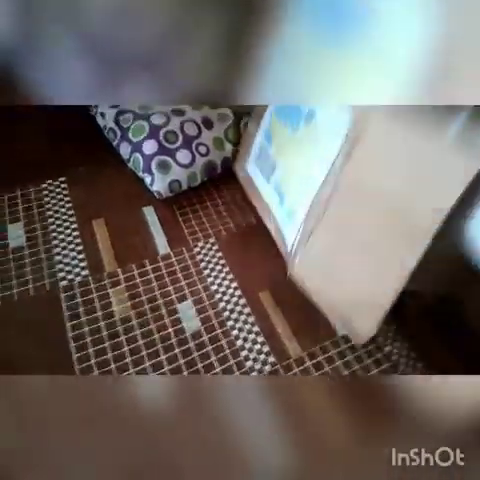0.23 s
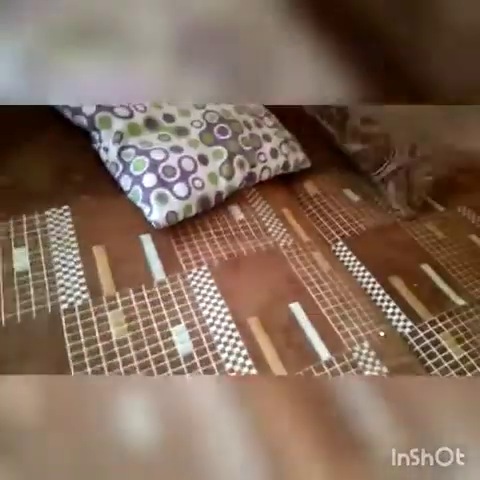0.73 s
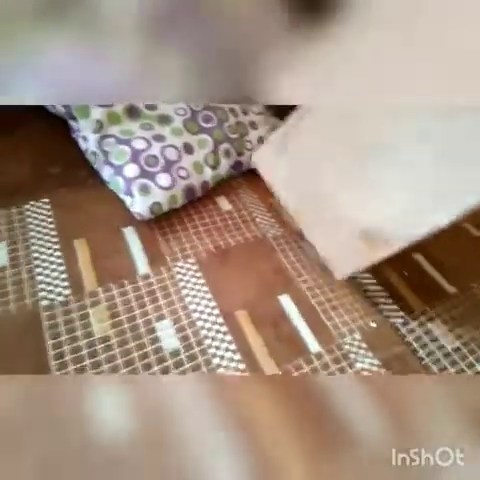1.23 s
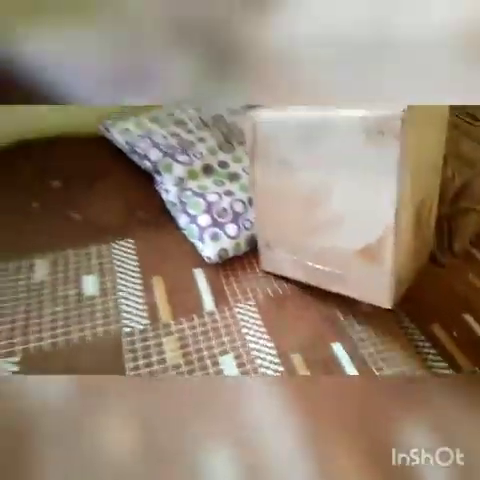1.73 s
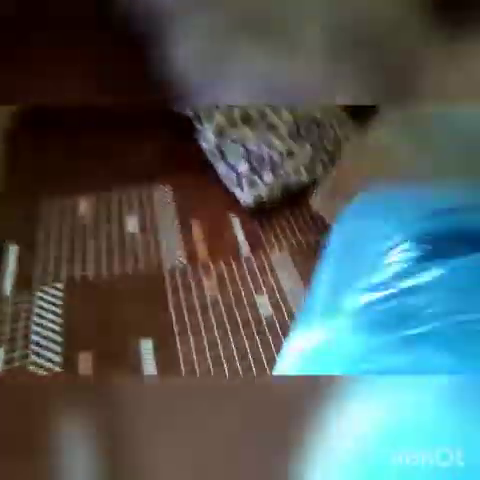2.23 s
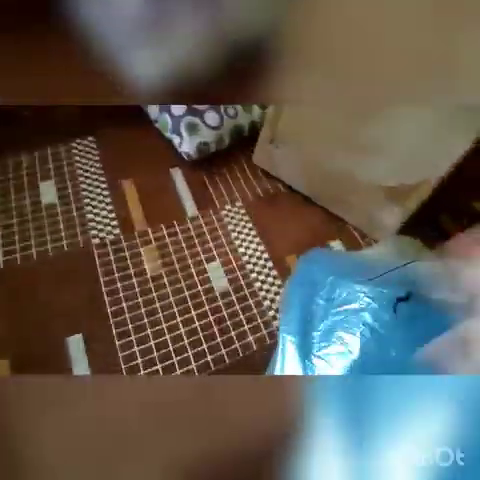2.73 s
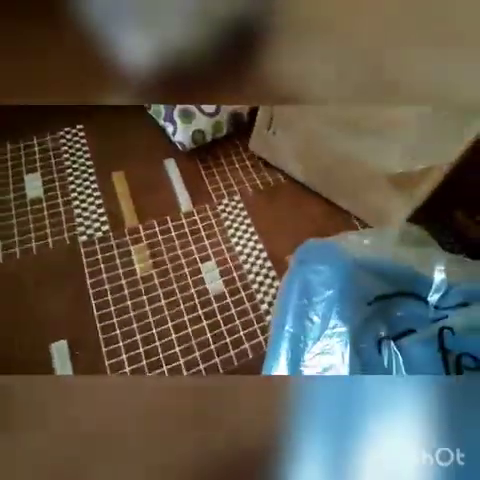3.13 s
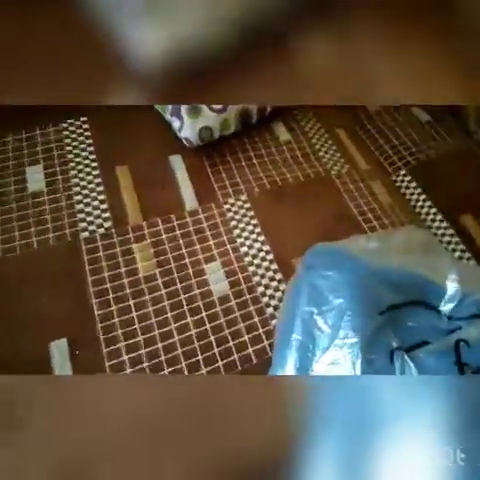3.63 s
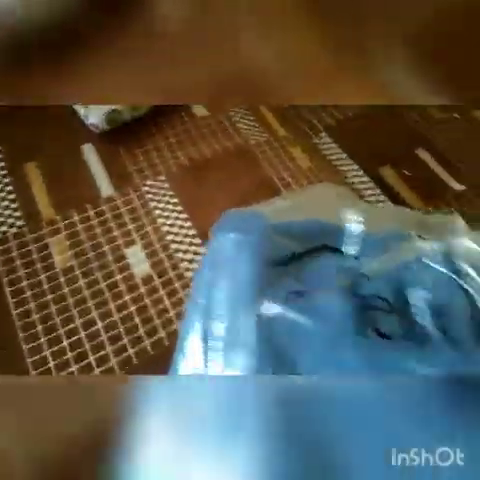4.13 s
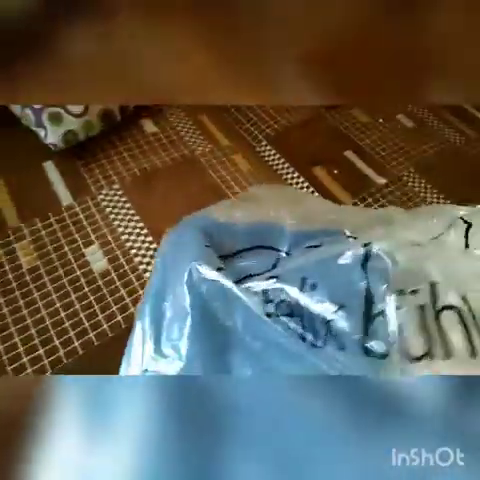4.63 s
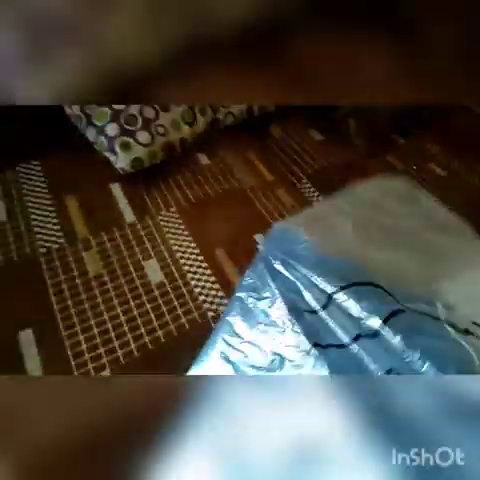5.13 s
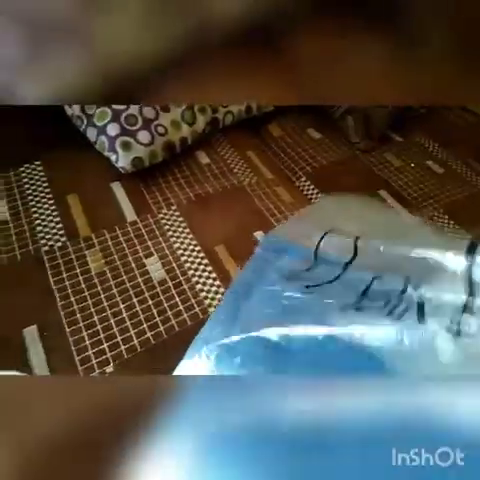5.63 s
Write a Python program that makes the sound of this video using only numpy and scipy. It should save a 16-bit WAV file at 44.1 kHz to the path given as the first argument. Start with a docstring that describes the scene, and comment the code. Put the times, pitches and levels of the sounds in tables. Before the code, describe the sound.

A cardboard box and a thin plastic bag are handled close to the microphone on a bed. From 0 to 1.2 s, dull bumps and cardboard rubbing mix with light film crackle and soft low mattress thuds. A sharper hollow knock lands at about 1.35 s, with smaller bumps until 1.55, then it goes almost silent. From 1.85 to 2.2 s plastic crumples in quick bright snaps; a low thud and rustle follow at 2.4. After a hush, a crisp crack bursts at 2.8 s. Boxy knocks cluster around 3.2 to 3.45, then quiet, and heavy dull bumps come at 3.9 to 4 s. From 4.05 to 5.1 s the film crackles densely, with loud buckles and soft rubbing. It drops to near silence around 5.35, then rustles again from 5.5 s to the end. Dry room; left side crisp and slightly whistly, right side muffled and quieter.

```python
"""A plastic bag is pulled out and handled while a cardboard box is tipped, knocked and set down on a bed.
Film: swarms of tiny snaps as band-limited noise, plus loud single buckles and dry ticks.
Box: rubbing and knocks drive damped wall modes that ring dully. Bed: low noise thuds from the mattress.
Two microphone ports: the left is open and resonates near 9.5 kHz; the right is covered by a hand, late and dull."""
import sys
import numpy as np
from scipy import signal
from scipy.io import wavfile
from scipy.ndimage import uniform_filter1d

SR = 44100
rng = np.random.default_rng(int(sys.argv[2]) if len(sys.argv) > 2 else 0)


def store_pcm(level_fs):
    """Save levels as 16-bit WAV."""
    pcm = np.round(np.clip(level_fs, -1, 1) * 32767).astype(np.int16)
    wavfile.write(sys.argv[1], SR, np.atleast_2d(pcm).T)


N = 258867
TOP_HZ = 15900  # upper limit of the sound


def film():
    """Small creases snap high and short, wide folds pop lower and longer; each port hears its own facets."""
    # Loud single buckles. Each row: time in seconds, relative level in dB, body against treble in dB.
    buckles = [(0.3631, -23.5, -26), (0.438, -32, -12), (0.5342, -24.5, -15), (0.801, -28.5, -14),
               (0.924, -21, -25), (1.3883, -44, -23), (1.503, -35, -6), (1.555, -31, -35),
               (1.622, -65, -30), (1.6448, -60, -26), (1.6883, -68, 8), (1.721, -67, -25),
               (1.749, -67.5, 10.5), (1.8397, -44, -20), (1.846, -49, -21), (1.8535, -24, -14.5),
               (1.877, -45, -12), (1.9136, -38, -16), (1.95, -30.5, -4), (1.966, -31, -16),
               (1.986, -23, -17), (1.993, -29, -18), (2.0144, -20, -20), (2.0644, -17, -17),
               (2.088, -18, -5), (2.1327, -26, -21), (2.611, -25.5, -30), (2.79, -32, 8), (2.7985, -15, -5),
               (2.8, -15.5, 3), (2.866, -19, -20), (2.876, -24.5, -16), (2.9235, -29, -15),
               (2.945, -28.5, -19), (3.201, -39, -19), (3.239, -30, -22), (3.2984, -25, -18),
               (3.3793, -26, -15), (3.6807, -40.5, 3.5), (3.8387, -32.5, -26), (3.8884, -23.5, -7),
               (4.043, -27, -26), (4.084, -24, -4), (4.159, -15.5, -5.5), (4.2313, -23, -19),
               (4.2757, -21, -14), (4.2984, -22, -21), (4.307, -22, -21), (4.312, -28, -18),
               (4.4075, -19.5, -18), (4.454, -25, -15), (4.4719, -16.5, -19), (4.476, -20, -18),
               (4.4805, -23, -15), (4.56, -30, 8), (4.624, -26, -4), (4.7211, -22, -21), (4.74, -24, -20),
               (4.861, -23, -22), (4.887, -23, -18), (4.942, -20, -19), (4.993, -21, -23),
               (5.0472, -24, -15), (5.199, -31.5, -32), (5.23, -43, -26.5), (5.5164, -43, -22),
               (5.607, -23, -21), (5.6395, -19, -25), (5.7423, -22, -24)]
    # Crease sizes. Each row: band from in Hz, band to in Hz, level in dB, likeness at the two ports 0-1,
    # share of the loud buckles in dB.
    creases = [(723, 1773, 5, 0.6, 3), (1473, 3110, 2.5, 0, 2), (2530, 5710, -0.5, 0.46, -5),
               (5560, 8260, -3, 0, -4.5), (6950, 12570, -4.5, 0.01, 3.5), (9910, 36000, -5.5, 0.08, -5)]
    # Moves that crumple the bag. Each row: time in seconds, hold in seconds, fade in dB per second,
    # relative crinkle level in dB, body of the crinkle against its treble in dB.
    crumples = [(0.0, 0.22, 110, -48, 1.5), (0.298, 0.16, 102, -43.5, -2.5),
                (0.529, 0.044, 131, -43.5, 1.5), (0.636, 0.059, 198, -39.5, -3),
                (0.807, 0.022, 97, -34, -4.5), (0.93, 0, 296, -44.5, 2), (1.012, 0.015, 152, -38, -1.5),
                (1.085, 0.072, 296.5, -46.5, -2.5), (1.168, 0.014, 548, -40, -11),
                (1.273, 0.0022, 404, -36.5, -17.5), (1.387, 0.026, 599, -59.5, -9),
                (1.406, 0.15, 209, -74.5, 4), (1.6, 0.33, 200, -88.5, 3.5), (1.713, 0, 400, -84, -11),
                (1.489, 0.018, 798, -50.5, -6.5), (1.553, 0, 400, -56, -19), (1.846, 0.013, 900, -61, -4),
                (1.88, 0.012, 498, -61.5, -4), (1.915, 0.1, 400, -61, -4), (1.977, 0.016, 495, -43, 0),
                (2.12, 0.22, 250, -48.5, -1.5), (2.025, 0.046, 294, -35.5, -2.5),
                (2.384, 0, 176, -35, -1.2), (2.49, 0.096, 80, -58.5, -0.5), (2.62, 0.037, 302, -50, -14.5),
                (2.79, 0.051, 904, -37.5, 3), (2.85, 0.016, 497, -41.5, 2), (2.876, 0.14, 396, -49, 1),
                (3.021, 0.022, 452, -45, -3), (3.152, 0.058, 200, -82, -14),
                (3.214, 0.018, 246, -40.5, -4.5), (3.295, 0.2, 248, -55, -21),
                (3.405, 0.033, 250, -43.5, 3), (3.49, 0, 351, -52.5, -1), (3.634, 0.076, 495, -59, -9.5),
                (3.735, 0.093, 140, -52.5, -31), (3.777, 0.013, 209, -55.5, -1.5),
                (3.894, 0.0038, 177, -44.5, -6), (3.966, 0.014, 290, -43.5, -2),
                (4.144, 0.15, 195, -43, -1), (4.55, 0.13, 194.5, -44, 1), (4.084, 0.018, 211, -38, -2.5),
                (4.31, 0, 116.5, -42, 1), (4.376, 0, 132, -36.5, 0.5), (4.464, 0.021, 306.5, -39.5, 1),
                (4.69, 0.055, 168, -42, -3), (4.822, 0.047, 197.5, -36, 0.5),
                (4.962, 0.038, 147, -37.5, -0.5), (5.076, 0.098, 396, -48.5, 1),
                (5.189, 0.0091, 362, -48, -24), (5.303, 0.051, 122.5, -79, 4.5),
                (5.518, 0.18, 798, -49, 0.5), (5.601, 0.027, 237, -43.5, 0), (5.674, 0.027, 200, -42.5, 0),
                (5.74, 0.024, 184, -40, -1.5), (5.828, 0.049, 161, -40, -1.5)]
    swell_ratio = 1.385  # swell speed against fade speed
    buckle_tail_s, fold_tail_s = .00065, .0021
    taut_from_s, tick_slack_db, tick_taut_db = 4.05, -7.5, -1.5  # ticks are louder on taut film

    crumple = moves(crumples, swell_ratio)
    db, body_db = np.transpose(crumples)[3:]
    treble, body = crumple(db), crumple(db + body_db)
    buckle_s, buckle_db, buckle_body_db = np.transpose(buckles)

    sheet = unit(swarm(1200, 3.1, clump_db=1.5, tail_s=.0007))
    ticks = unit(swarm(130, 2.2, clump_db=1.5, tail_s=.0004)) * treble
    slack = np.arange(N) < taut_from_s * SR
    ticks = ticks * undb(np.where(slack, tick_slack_db, tick_taut_db))

    out = 0
    for lo_hz, hi_hz, size_db, alike, share_db in creases:
        small = lo_hz > 4000
        # every loud buckle has its own colour
        colour_db = share_db + 1.2 * rng.standard_normal(len(buckle_s))
        if small:
            loud = bursts(buckle_s, buckle_db + colour_db - 5, buckle_tail_s)
            loud = loud + ticks * undb(size_db)
        else:
            loud = bursts(buckle_s, buckle_db + buckle_body_db + colour_db - 7, fold_tail_s)
        out = out + band(loud * np.sign(pair(alike)), lo_hz, hi_hz)

        edges_hz = np.geomspace(lo_hz, min(hi_hz, TOP_HZ), 4)
        for from_hz, to_hz in zip(edges_hz, edges_hz[1:]):
            # creases of one size buckle on their own and also when the whole sheet moves
            own = unit(swarm(0.11 * lo_hz, 2.2, clump_db=2.5, tail_s=13.6 / lo_hz))
            level = undb(size_db + 0.67 * walk(35)) * (treble if small else body)
            force = (own + 0.6 * sheet) * level
            out = out + band(force * pair(alike), from_hz, to_hz)
    return out * pauses()


def box():
    """Rubbing and knocks ring the same walls; a knock favours the wall nearest its pitch."""
    # Knocks. Each row: time in seconds, relative level in dB, pitch of the wall that is hit in Hz,
    # sharp edge against level in dB, contact pulse against level in dB.
    knock_rows = [(0.1771, -23, 257, -30, 11.5), (0.183, -24, 148, -41, 2), (0.31, -25.5, 111, -18, -3),
                  (0.349, -18.5, 312, -30, -4), (0.401, -35.5, 322, -2, -17), (0.545, -28.5, 790, -7, -11),
                  (0.771, -34, 326, 0, -5), (0.797, -22.5, 162, -23, -14), (0.81, -27, 180, -6, -14),
                  (1.027, -25, 289, -23, -9), (1.236, -38, 55.8, -25, -27), (1.3419, -19.5, 248, -42, -20),
                  (1.3433, -16, 403, -10.5, -10.5), (1.36, -21.5, 170, -35, -21),
                  (1.417, -24.5, 388, -30, -24), (1.42, -28.5, 245, -28, -25), (1.454, -26, 52.3, -34, -16),
                  (1.503, -23.5, 965, -35, -31), (1.558, -32, 231, -30, -22), (1.563, -39.5, 387, -28, -6),
                  (1.615, -50, 238, -38, -25), (1.658, -46, 235, -32, -21), (1.697, -50.5, 203, -34, -22),
                  (1.848, -59, 797, 5, -25), (2.037, -32, 77, -17, -20), (2.355, -18, 91, -22, -9),
                  (2.799, -27.5, 460, -8, -6), (3.197, -27, 176, -19, -2), (3.238, -12.5, 163, -23, -26),
                  (3.261, -18.5, 200, -12.5, -31), (3.314, -33.5, 740, -30, -25),
                  (3.338, -32, 670, -30, -25), (3.385, -29, 740, -24.5, -20), (3.545, -40, 220, -29, -25),
                  (3.399, -23, 306, 1, 6), (3.408, -11.5, 216, -7.5, -2), (3.413, -18, 800, -7, 5),
                  (3.443, -12.5, 217, -16.5, -25), (3.7, -51, 385, -30, -19),
                  (3.836, -30.5, 61.9, -14.5, -9), (3.885, -22, 203, -35, -4),
                  (3.946, -13.5, 163, -32, -37), (3.961, -12, 111, -38, -25), (3.968, -14.5, 199, -20, -6),
                  (4.212, -38, 52, -15, -18), (4.393, -35.5, 360, -11, 7), (4.556, -31, 441, -13, 1.5),
                  (4.799, -37.5, 370, -26, -8), (5.325, -54, 310, -20, -1.5), (5.368, -58, 394, -10, -12)]
    # Modes of the walls and cavity. Each row: frequency in Hz, level in dB, T60 in seconds.
    walls = [(51.3, -5, 0.15), (76, -2, 0.081), (108, -1.5, 0.23), (174.6, -2, 0.21), (202.2, -9.5, 0.24),
             (214.6, -0.5, 0.15), (248.9, 1.5, 0.13), (293.3, 3.5, 0.093), (369.5, 11, 0.05),
             (406, -0.5, 0.12), (513, 1, 0.029), (687, -1, 0.05), (811, -2, 0.059), (917, -4.5, 0.055),
             (1060, -6.5, 0.039), (1550, -18.5, 0.015)]
    # Moves that rub the box. Each row: time in seconds, hold in seconds, fade in dB per second,
    # relative rub level in dB, scrape of the flaps against it in dB, pitch of the wall that is held in Hz.
    rubs = [(0.0, 0.2, 191, -45.5, -6.5, 330), (0.188, 0.03, 504, -39.5, -16.5, 252),
            (0.235, 0.19, 155.5, -46, -4, 260), (0.359, 0.033, 202, -34, -11, 280),
            (0.423, 0.13, 200, -57.5, 8, 324), (0.64, 0.057, 114, -38, -5, 202),
            (0.696, 0.23, 202, -44.5, -1, 250), (0.78, 0.05, 200, -33.5, -4.5, 237),
            (1.007, 0.05, 103.5, -41.5, -0.5, 294), (1.175, 0.025, 814, -55.5, 9, 343),
            (1.259, 0.062, 499, -49, -2, 160), (1.337, 0.12, 1895, -32.5, -26, 232),
            (1.489, 0.035, 500, -57.5, 3.5, 161), (1.557, 0, 128, -50.5, -28, 242),
            (1.848, 0, 196, -83, 18, 288), (1.993, 0.078, 190, -41.5, -4, 197),
            (2.234, 0, 135, -60, 6.5, 410), (2.372, 0.018, 125, -39.5, -4.5, 276),
            (2.813, 0.0068, 236, -37, 0, 314), (2.928, 0.099, 261, -55.5, 4, 340),
            (3.19, 0.034, 500, -35.5, -9, 316), (3.339, 0.15, 503, -35, -17.5, 223),
            (3.28, 0.071, 700, -36.5, -13.5, 203), (3.399, 0, 209.5, -34, 2, 236),
            (3.443, 0, 154, -35.5, -13.5, 231), (3.709, 0.068, 611, -59, -23, 300),
            (3.888, 0, 500, -28.5, -18.5, 203), (3.99, 0.016, 116.5, -30, -12, 194),
            (4.087, 0.24, 61.5, -36.5, -10, 209), (4.47, 0.51, 94, -50, -1, 415),
            (4.82, 0.063, 180, -39, -5.5, 330), (4.926, 0.22, 245, -56, 1.5, 424),
            (5.328, 0.046, 274, -74, 2, 318), (5.534, 0.1, 298, -44.5, -5.5, 316),
            (5.668, 0.28, 200, -48, 0, 324)]
    swell_ratio = 1.88
    rub_from_hz, flaps_from_hz = 140, 480

    hands = moves(rubs, swell_ratio)
    rub_db, flap_db, held_hz = np.transpose(rubs)[3:]
    grain = swarm(600, 1.63, clump_db=2.0, tail_s=0.002)
    rub, scrape = grain * pair(0.95), grain * pair(0.92)
    where_db = 2 * rng.standard_normal((len(knock_rows), len(walls)))  # each knock lands elsewhere
    knock_s, knock_db, pitch_hz, edge_db, contact_db = np.transpose(knock_rows)
    at = (knock_s * SR).astype(int)

    low, flaps, knocks = 0, 0, 0
    for k, (hz, wall_db, t60_s) in enumerate(walls):
        touch = undb(wall_db + 3.6 * walk(12))
        share_db = -28 * np.abs(np.log2(hz / pitch_hz))
        if hz > flaps_from_hz:
            flaps = flaps + touch * unit(ring(scrape, hz, 0.4 * t60_s))
            share_db = np.maximum(share_db, edge_db + 0.5)
        elif hz > rub_from_hz:
            held_db = -26 * np.abs(np.log2(hz / held_hz))
            force = touch * hands(rub_db - 11.0 + held_db)
            low = low + ring(rub * force, hz, t60_s) / np.std(ring(rub, hz, t60_s))
        blow = np.zeros(N)
        blow[at] = undb(knock_db + wall_db + share_db - 5.5 + where_db[:, k])
        # the push lasts a part of a swing, which keeps the start of low rings soft
        push = np.hanning(int(.3 * SR / hz) + 3)
        push = push / push.sum()
        knocks = knocks + (-1) ** k * ring(np.convolve(blow, push)[:N], hz, t60_s)

    # the contact itself is one short pressure pulse
    contact = np.zeros(N)
    contact[at] = undb(knock_db + contact_db)
    contact = 30 * band(band(contact, 140, 580), 76, 1500)
    rubbing = low + unit(flaps) * hands(rub_db + flap_db + 1.0)
    return pauses() * rubbing + knocks + contact


def bed():
    """Soft pushes into the padding and a deeper sway of the springs, each band evened in strength."""
    # Shifts of weight on the mattress. Each row: time in seconds, hold in seconds, fade in dB per second,
    # relative level in dB, deep sway against it in dB.
    shifts = [(0.1, 0, 298, -52, -4), (0.171, 0.016, 599, -26.5, -7), (0.308, 0.02, 301, -34, -1),
              (0.355, 0.0026, 150, -36.5, 2), (0.632, 0.16, 199, -40.5, -10),
              (0.857, 0.072, 598, -44.5, -10), (1.025, 0.039, 331, -41, -16), (1.237, 0.048, 403, -36.5, 5),
              (1.327, 0.16, 195, -45.5, 2.5), (1.455, 0.018, 294, -38, 8), (1.546, 0.042, 73.5, -67.5, 5),
              (2.032, 0, 148, -42.5, -10), (2.362, 0.015, 250, -31, -24), (2.39, 0.012, 132, -43, 14.5),
              (2.48, 0.13, 132, -56.5, 11), (2.792, 0.02, 206, -40, 2), (2.84, 0.063, 505, -53.5, 18),
              (3.238, 0.03, 304, -33.5, -13.5), (3.435, 0.026, 235, -42, -15), (3.7, 0.06, 364.5, -62, -10),
              (3.845, 0.045, 212, -31, 1), (3.957, 0, 130, -27, -2), (4.064, 0.19, 110, -44, 2),
              (4.187, 0.096, 127, -40, 6.5), (4.46, 0.15, 499.5, -53.5, 4), (4.687, 0.043, 231.5, -47, -11),
              (4.807, 0.071, 599.5, -42, -9), (4.938, 0.0055, 172.5, -48, -1), (5.07, 0, 141, -53.5, 3),
              (5.526, 0.23, 66, -53.5, -14)]
    swell_ratio = 4.7

    shift = moves(shifts, swell_ratio)
    db, sway_db = np.transpose(shifts)[3:]
    padding = (51.0, 124.0, db - 1.5)
    springs = (11.7, 35.3, db + sway_db - 6.0)
    out = 0
    for lo_hz, hi_hz, level_db in (padding, springs):
        pushes = band(band(pair(0.87), lo_hz, hi_hz), 0.43 * lo_hz, 2.3 * hi_hz)
        # dividing by the short-term level makes one push about as strong as the next
        power = uniform_filter1d(pushes[0] ** 2, size=SR // 16)
        even = np.sqrt(power + 0.26 * np.var(pushes))
        out = out + unit(pushes / even) * shift(level_db)
    return out * pauses()


def moves(table, swell_ratio):
    """Hand moves swell, hold and fade, then settle faintly; returns a function from move levels to envelope."""
    settle_db, settle_db_per_s = -45, 107
    start_s, hold_s, fade_db_per_s = np.transpose(table)[:3, :, None]
    t = np.arange(0, N / SR + .002, .002)
    before_s = np.maximum(start_s - t, 0)
    after_s = np.maximum(t - start_s - np.abs(hold_s), 0)
    fade_db = np.maximum(-fade_db_per_s * after_s, settle_db - settle_db_per_s * after_s)
    power = undb(fade_db - swell_ratio * fade_db_per_s * before_s) ** 2

    def envelope(db):
        """Sums the power of all moves."""
        return np.interp(np.arange(N) / SR, t, np.sqrt(undb(db) ** 2 @ power))

    return envelope


def pauses():
    """The hand holds still just before each sudden move: a gain that sinks towards it."""
    # Sudden moves. Each row: time in seconds, hush before it in dB (negative: a slight rise).
    jerks = [(0.174, 1.5), (1.237, 13), (1.338, 8), (1.416, 3.5), (1.451, 8), (1.551, 7), (1.943, 12.5),
             (2.608, -1.5), (2.782, 34), (3.199, 28), (3.237, 7.5), (3.396, 7), (3.831, 10), (4.041, 9.5),
             (5.491, 16.5)]
    t, gain = np.arange(N) / SR, 1
    for s, depth_db in jerks:
        gain = gain * undb(-depth_db * (t < s) * np.exp(-np.abs(s - t) / 0.035))
    return uniform_filter1d(gain, size=SR // 250)


def swarm(rate_hz, spread_db, clump_db, tail_s):
    """Envelope of random clicks, many small and few large, in clumps; power decays with constant tail_s."""
    chance = rng.random((2, N))
    size = undb(-spread_db * np.log(chance[1] + 0.0029) + clump_db * walk(70))
    hits = chance[0] < rate_hz / SR
    return np.sqrt(fade(hits * size ** 2, tail_s))


def bursts(times_s, db, tail_s):
    """Envelope that jumps up at each time and dies away."""
    gate = np.zeros(N)
    np.add.at(gate, (times_s * SR).astype(int), undb(db))
    return fade(gate, tail_s)


def walk(rate_hz):
    """Random levels held 1 / rate_hz seconds and slewed; spread near 1."""
    k = int(SR / rate_hz)
    return 1.32 * uniform_filter1d(np.repeat(rng.standard_normal(N // 50), k)[:N], k)


def pair(alike):
    """Noise for the two ports, correlated by alike."""
    a, b = rng.standard_normal((2, N))
    alike = np.clip(alike, 0, 1)
    return np.array([a, alike * a + np.sqrt(1 - alike ** 2) * b])


def ring(x, hz, t60_s):
    """One damped mode; a unit impulse rings with peak near 1."""
    r, w = np.exp(-np.log(1000) / (t60_s * SR)), 2 * np.pi * hz / SR
    return signal.lfilter([0, np.sin(w)], [1, -2 * r * np.cos(w), r * r], x)


def fade(x, tail_s):
    """Every value of x dies away with time constant tail_s."""
    return signal.lfilter([1], [1, -np.exp(-1 / (tail_s * SR))], x)


def band(x, lo_hz, hi_hz, order=2):
    """Butterworth band-pass."""
    sos = signal.butter(order, [lo_hz, min(hi_hz, .48 * SR)], "band", fs=SR, output="sos")
    return signal.sosfilt(sos, x)


def undb(db):
    """Decibels to amplitude."""
    return 10 ** (np.asarray(db) / 20)


def unit(x):
    """Scales to RMS 1."""
    return x / np.sqrt(np.mean(x ** 2))


def scene():
    """Sums the sources at both ports, delays the covered right one and adds faint noise."""
    lag_samples, noise_db = 6, -106
    near = 1.02 * (film() + box() + bed())
    near[1] = np.r_[np.zeros(lag_samples), near[1]][:N]
    return near + rng.standard_normal((2, N)) * undb(noise_db)


def record(dry):
    """The open port resonates, the covered one loses its treble but for a thin leak at the top; the top is cut."""
    port_hz, port_width_hz, port_db = 9470, 1046, 13
    hand_hz, hand_db, leak_db = 3650, -7.5, -15

    peak = signal.lfilter(*signal.iirpeak(port_hz, port_hz / port_width_hz, fs=SR), dry[0])
    left = dry[0] + undb(port_db) * peak

    covered = dry[1]
    for cut_hz in (hand_hz, 7000):
        covered = signal.sosfilt(signal.butter(2, cut_hz, fs=SR, output="sos"), covered)
    leak = undb(leak_db) * band(dry[1], 12000, 20000)
    right = undb(hand_db) * (covered + leak)

    top_cut = signal.ellip(10, .2, 60, TOP_HZ, fs=SR, output="sos")
    return signal.sosfilt(top_cut, np.array([left, right]))


dry = scene()
out = record(dry)
store_pcm(out)
```